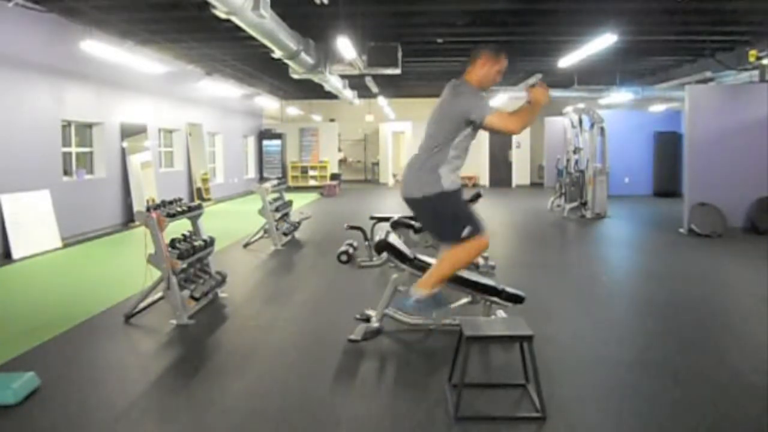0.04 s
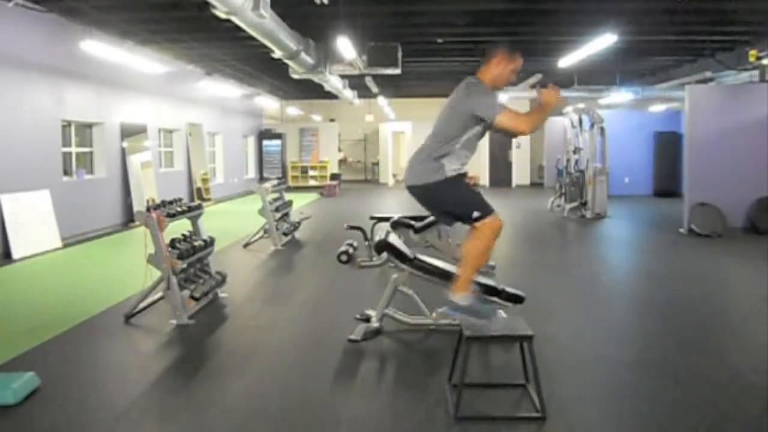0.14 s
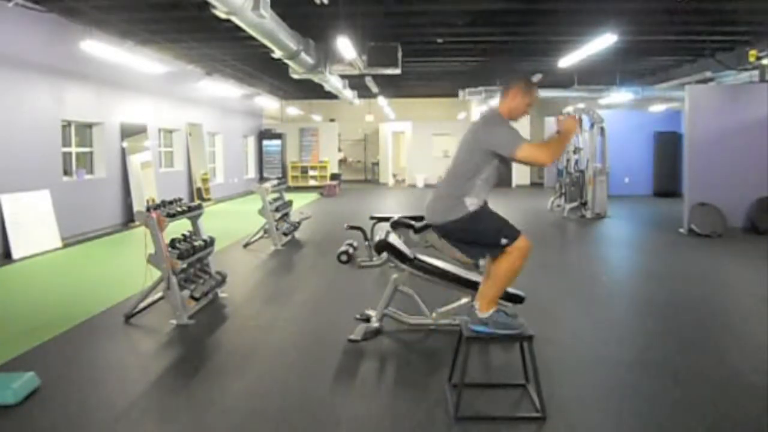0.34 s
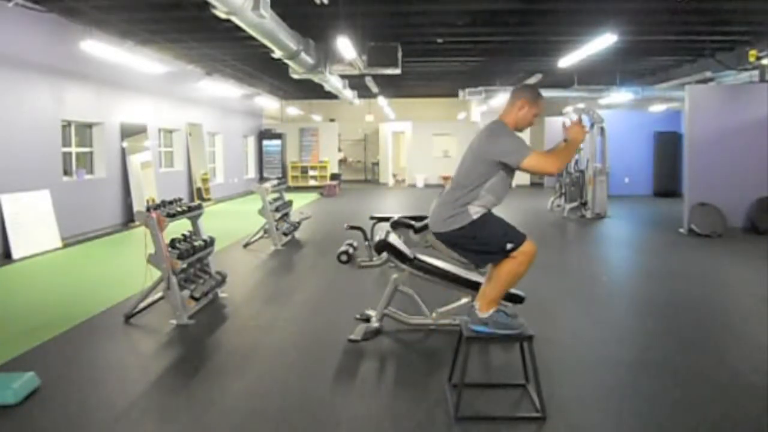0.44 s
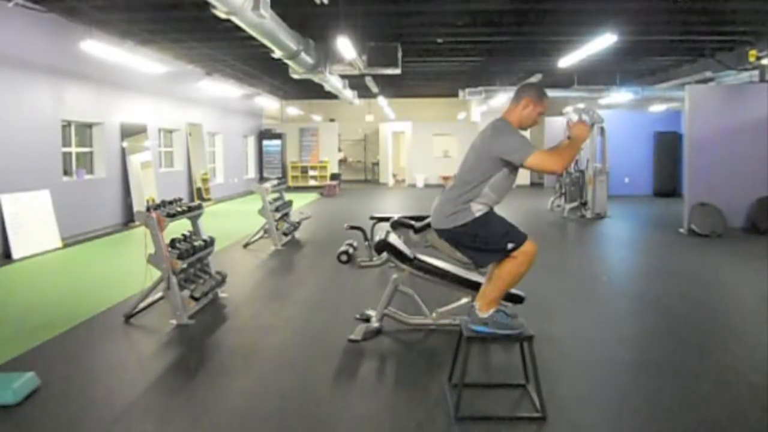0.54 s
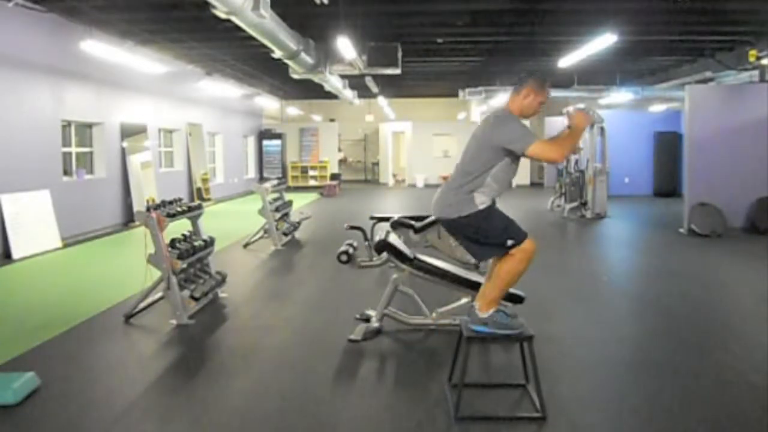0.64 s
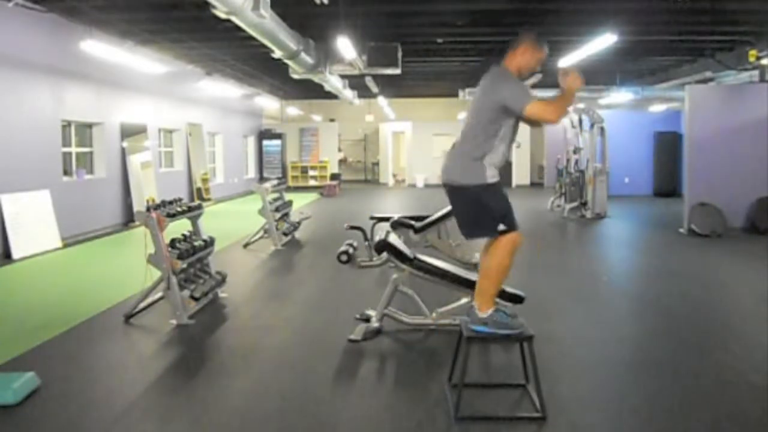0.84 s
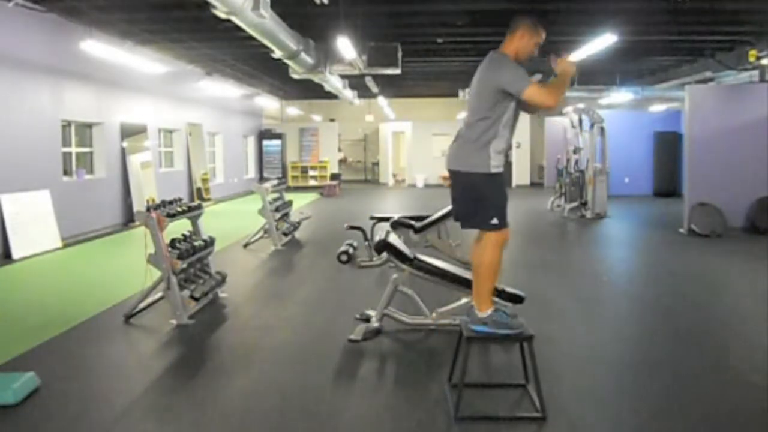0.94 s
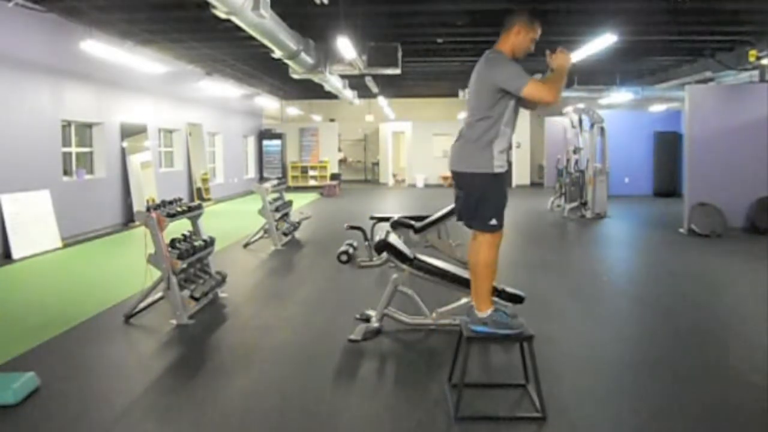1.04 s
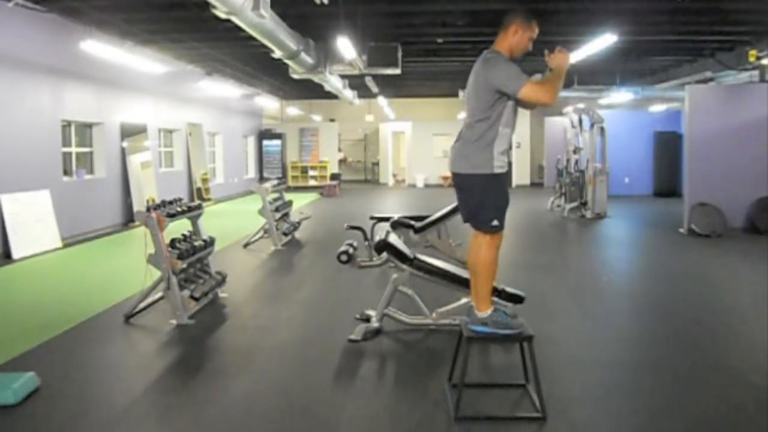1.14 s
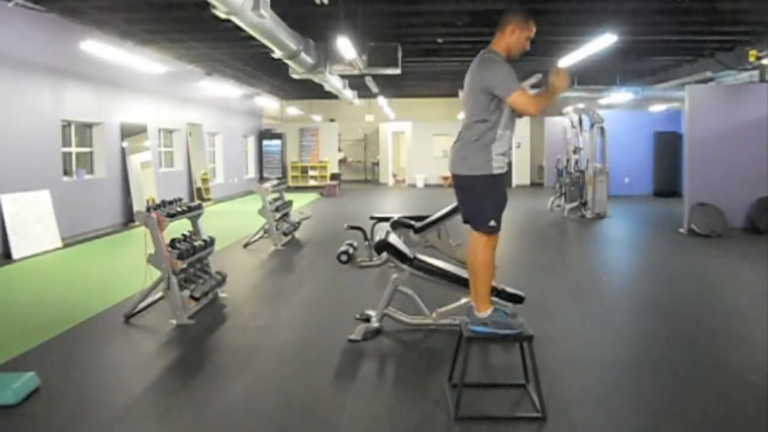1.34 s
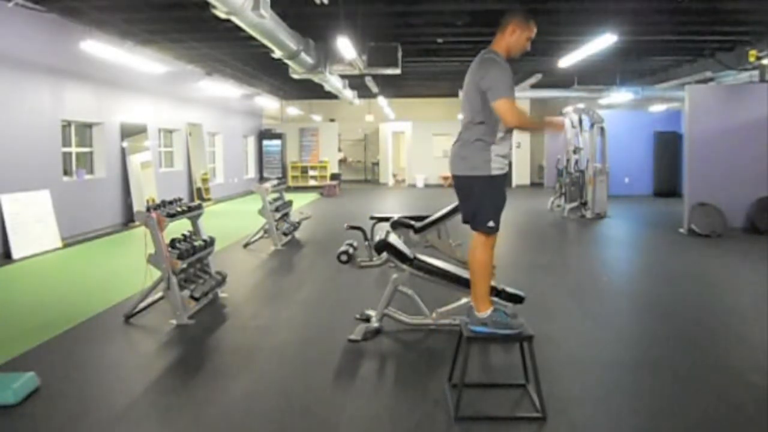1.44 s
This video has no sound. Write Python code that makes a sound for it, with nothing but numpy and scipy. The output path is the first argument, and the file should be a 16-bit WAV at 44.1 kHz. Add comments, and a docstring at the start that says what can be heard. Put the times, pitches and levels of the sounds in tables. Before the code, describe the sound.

Feet thud onto a padded metal box in an echoing gym with steady ventilation rush.

```python
"""In a large, echoing gym, a person jumps onto a low steel-framed box with a padded top.
Ventilation rushes, the mains and fans hum, and a thin electronic whine goes on throughout.
Clothes swish, rubber soles scuff the top, and the feet thud down in a quick cluster that rings the
frame. Softer knocks and echoes follow the landing while the hall rings."""
import sys
import numpy as np
from scipy import signal
from scipy.fft import rfft, irfft
from scipy.io import wavfile
from scipy.ndimage import uniform_filter1d

SR = 44100
rng = np.random.default_rng(int(sys.argv[2]) if len(sys.argv) > 2 else 0)


def digitize_waveform(pressure):
    """Quantize a signal to 16-bit integers and store it at the path in sys.argv[1].

    Rows of a 2-D input are taken as channels; values are limited to [-1, 1].
    """
    field = np.atleast_2d(pressure).T
    bounded = np.clip(field, -1, 1)
    quanta = np.round(bounded * 32767).astype(np.int16)
    wavfile.write(sys.argv[1], SR, quanta)


N = 66150

# tone colour of the rushing air: f/Hz, relative level/dB
AIR_COLOUR = [(15, -23), (28, -12), (42, -15), (58, -7), (78, -12), (110, -8), (150, -7.5), (195, -.5),
              (238, 2.5), (275, -3), (310, -2.5), (400, -5.5), (480, -4), (570, -8), (690, -6), (820, -8.5),
              (1200, -11), (1650, -18), (2500, -21.5), (4000, -24.2), (6500, -26.7), (8500, -27),
              (9600, -30.5), (10400, -39.5), (11000, -55)]
# hum of the mains and fans: f/Hz, level/dB, amount of waver
HUM_TONES = [(58.5, -49.5, .7), (119.7, -37, .26), (240, -48.5, .6), (495, -53, .5), (694, -47.5, .5),
             (748, -53, .4)]
# slight rise and fall of the background: t/s, level/dB
BACKGROUND_LEVEL = [(0, .8), (.2, .8), (.3, -.8), (.6, -1), (1.0, -.5), (1.3, -.1), (1.44, .9), (1.5, .4)]
# tone colour of the clothes: f/Hz, relative level/dB
SWISH_COLOUR = [(300, -20), (1000, 0), (2500, -1), (5000, -4), (8500, -4), (10500, -20)]
# soles scuffing the top: t/s, level/dB, rise/s, decay/s
SOLE_SCUFFS = [(.192, -27.5, .022, .042), (.243, -37.5, .008, .03)]
# tone colour of the scuffs: f/Hz, relative level/dB
SCUFF_COLOUR = [(200, -20), (450, -8), (620, 0), (1200, -1), (1700, -12), (2600, -12), (3500, -16),
                (4500, -23), (7000, -31), (11000, -44)]
# thuds of the landing, then softer knocks and echoes: t/s, relative level/dB, pulse length/ms
THUDS = [(.2279, -6, .7), (.2359, -7.5, .15), (.2459, -1, .17), (.2584, 2, .72), (.2782, -1, .5),
         (.4495, -11, .7), (.4995, -12, .8), (.62, -18, .7), (.738, -16, .8), (.929, -16, .8)]
# notes at which the top and frame ring: f/Hz, relative level/dB, time to fade by 60 dB/s
BOX_NOTES = [(111, -21, .13), (225, -4.8, .27), (267, 3.5, .28), (321, 2, .27), (438, -8, .13),
             (509, -6, .13), (545, -14, .08), (604, .7, .09), (670, -7.5, .13), (735, -22, .06),
             (885, -28, .05), (1240, -22, .03)]
# how long the gym rings: f/Hz, time to fade by 60 dB/s
GYM_FADE = [(100, 1.0), (250, 1.55), (600, 1.3), (1500, 1.0), (8000, .5)]
# tone colour of the gym's ringing: f/Hz, level/dB
HALL_COLOUR = [(90, -3), (160, -5), (203, 3.5), (238, 0), (268, -5), (318, -3.5), (380, -9), (440, 4),
               (515, 1.5), (600, -3.5), (675, 8), (770, 9), (950, 6), (1500, 3), (5000, 0)]
# echoes from the far walls: delay/s, level/dB
WALL_ECHOES = [(.172, -12), (.38, -19)]


def amp(db):
    """Turns decibels into a number to multiply by."""
    return 10 ** (np.asarray(db) / 20)


def unit(x):
    """Scales a signal to an average power of one."""
    return x / np.sqrt(np.mean(abs(x) ** 2) + 1e-20)


def look_up(table, hz):
    """Reads between the rows of a table, spacing frequencies by pitch."""
    f, value = np.transpose(table)
    return np.interp(np.log(hz + 1), np.log(f + 1), value)


def colour(x, table):
    """Turns each frequency of a sound up or down as a table says."""
    gain = amp(look_up(table, np.fft.rfftfreq(2 * N, 1 / SR)))
    return irfft(rfft(x, 2 * N) * gain)[:N]


def ventilation(level_db=-34.7, patch_db=.8):
    """Air rushes broadly, with faint louder and softer patches drifting through it."""
    bands = signal.stft(rng.standard_normal(N), nperseg=1024)[2]
    patches = uniform_filter1d(rng.standard_normal(bands.shape), size=10, axis=0)  # smooth in pitch
    patches = unit(uniform_filter1d(patches, size=8, axis=1))  # and in time
    rush = signal.istft(bands * amp(patch_db * patches), nperseg=1024)[1][:N]
    return amp(level_db) * unit(colour(rush, AIR_COLOUR))


def hum(waver_hz=5):
    """The mains and fans give steady tones that waver a little."""
    t, out = np.arange(N) / SR, np.zeros(N)
    slow_band = np.exp(-(np.fft.fftfreq(N, 1 / SR) / waver_hz) ** 2)
    for hz, db, waver in HUM_TONES:
        drift = unit(np.fft.ifft(slow_band * np.exp(2j * np.pi * rng.random(N))))
        tone = np.exp(2j * np.pi * (hz * t + rng.random()))
        out += amp(db) * unit(((1 + waver * drift) * tone).real)
    return out


def whine(pitch_hz=7856, level_db=-58, flutter_hz=30, depth_hz=29):
    """A high electronic tone stays equally loud while its pitch flutters quickly."""
    t = np.arange(N) / SR
    hz = pitch_hz + depth_hz * np.sin(2 * np.pi * (flutter_hz * t + rng.random()))
    return amp(level_db) * unit(np.sin(2 * np.pi * np.cumsum(hz) / SR))


def clothes(peak_s=.16, spread_s=.13, level_db=-45.5):
    """Fabric swishes faintly as the knees come up."""
    t = np.arange(N) / SR
    swell = np.exp(-((t - peak_s) / spread_s) ** 2)
    return amp(level_db) * swell * unit(colour(rng.standard_normal(N), SWISH_COLOUR))


def soles(grain_db=2):
    """Rubber grips and slips in fine grains just before the weight arrives."""
    t, level = np.arange(N) / SR, np.zeros(N)
    for start, db, rise, decay in SOLE_SCUFFS:
        fade_in = np.clip((t - start) / rise, 0, 1)
        fade_out = np.exp(-np.maximum(t - start - rise, 0) / decay)
        level += amp(db) * fade_in * fade_out
    grains = amp(grain_db * unit(uniform_filter1d(rng.standard_normal(N), size=60)))
    return level * unit(colour(grains * rng.standard_normal(N), SCUFF_COLOUR))


def box(polarity, ring_gain_db=-15, thud_gain_db=-10.5, thud_hz=380, thud_s=.0011):
    """The landing thuds on the top and rings the frame; softer knocks and echoes share that sound."""
    t, pulses = np.arange(N) / SR, np.zeros(N)
    for start, db, length_ms in THUDS:
        age = np.maximum(t - start, 0) * 2000 / length_ms  # a longer pulse sounds duller
        pulse = age * np.exp(-age)
        pulses += amp(db) * pulse / pulse.sum()
    # depending on direction, neighbouring notes start in step (polarity 1) or opposed (-1)
    ring = sum(polarity ** k * amp(db - 60 * t / fade_s) * np.sin(2 * np.pi * hz * t)
               for k, (hz, db, fade_s) in enumerate(BOX_NOTES))
    thud = np.exp(1 - t / thud_s) * np.cos(2 * np.pi * thud_hz * t) * t / thud_s
    knocks = signal.fftconvolve(pulses, amp(ring_gain_db) * ring + amp(thud_gain_db) * thud)[:N]
    # the open frame gives off little bass, and the padding soaks up the treble
    return signal.sosfilt(signal.butter(2, [165, 920], "band", fs=SR, output="sos"), knocks)


def gym(x, delay_s=.012, build_s=.13):
    """Many reflections build up across the hall, then each pitch fades at its own speed."""
    t = np.arange(N) / SR
    hz, when, bands = signal.stft(rng.standard_normal(N), SR, nperseg=512)
    fade = amp(-60 * when / look_up(GYM_FADE, hz)[:, None])
    tail = signal.istft(bands * fade, SR, nperseg=512)[1][:N]
    tail *= np.sqrt(np.clip((t - delay_s) / build_s, 0, 1))
    spectrum = rfft(tail)
    spectrum /= np.sqrt(uniform_filter1d(abs(spectrum) ** 2, size=30))  # even out before colouring
    tail = irfft(spectrum, N) * (t > delay_s)
    return signal.fftconvolve(x, colour(tail, HALL_COLOUR))[:N]


def walls(x, cutoff_hz=550):
    """The far ends of the hall send back dull, separate echoes."""
    t = np.arange(N) / SR
    dull = signal.sosfilt(signal.butter(2, cutoff_hz, fs=SR, output="sos"), x)
    return sum(amp(db) * np.interp(t - delay, t, dull, left=0) for delay, db in WALL_ECHOES)


def scene(scuff_send_db=-13):
    """Adds the jump and its echoes to the steady background."""
    thump, thump_into_hall = box(polarity=1), box(polarity=-1)
    scuff = soles()
    echoes = gym(thump_into_hall + amp(scuff_send_db) * scuff) + walls(thump_into_hall)
    jump = clothes() + scuff + thump
    level = amp(np.interp(np.arange(N) / SR, *np.transpose(BACKGROUND_LEVEL)))
    background = level * (ventilation() + hum() + whine())
    return (background + jump + echoes)[None]


def record(dry, cutoff_hz=10750):
    """Cuts away the highest treble."""
    low_pass = signal.firwin(511, cutoff_hz, window=("kaiser", 9), fs=SR)
    return signal.oaconvolve(dry, low_pass[None], "same")


dry = scene()
out = record(dry)
digitize_waveform(out)
```